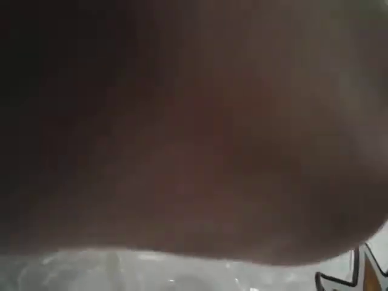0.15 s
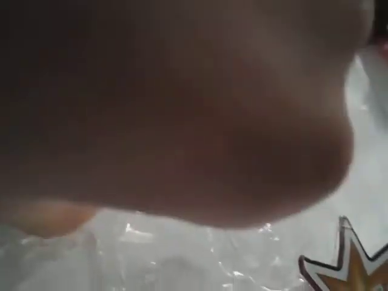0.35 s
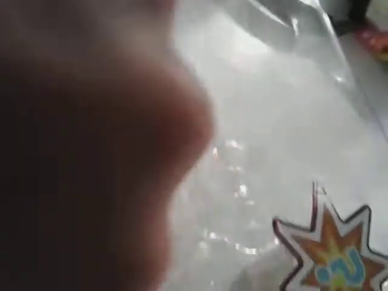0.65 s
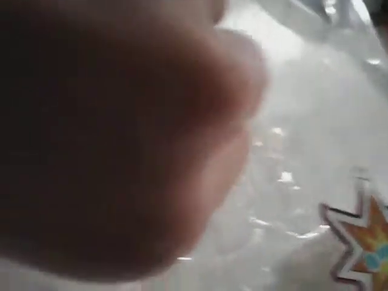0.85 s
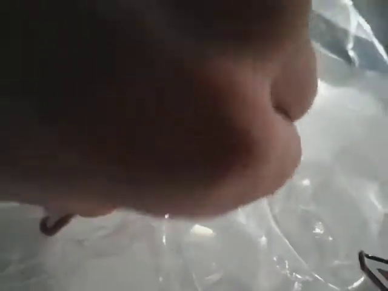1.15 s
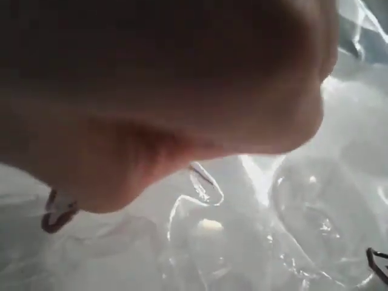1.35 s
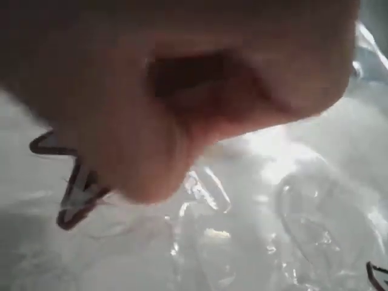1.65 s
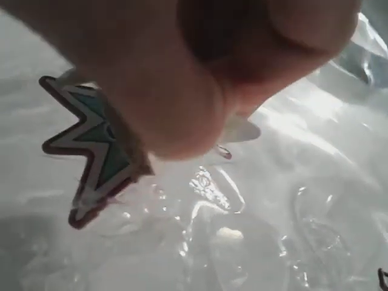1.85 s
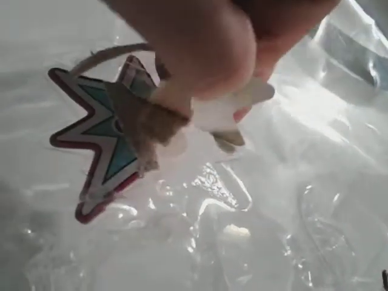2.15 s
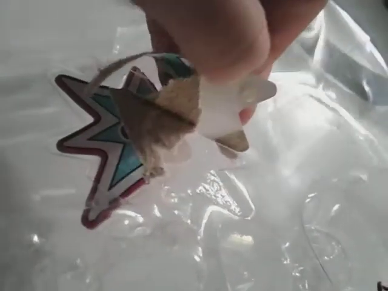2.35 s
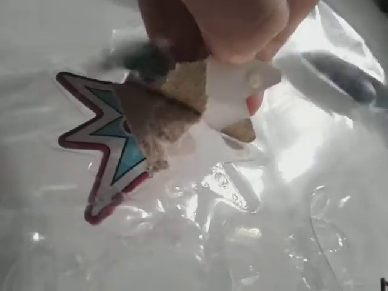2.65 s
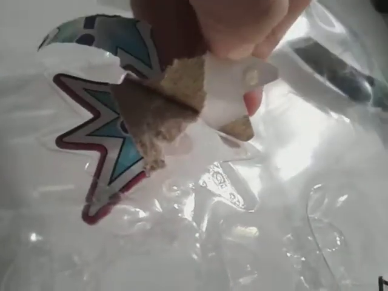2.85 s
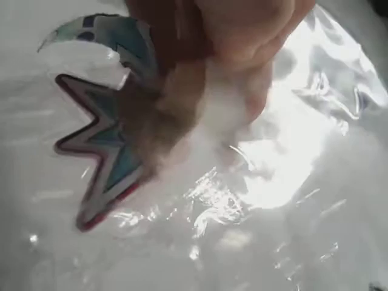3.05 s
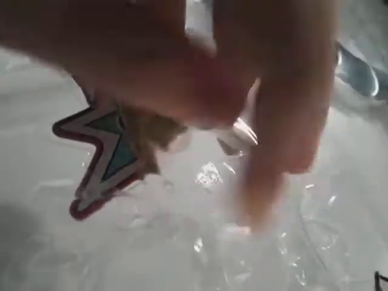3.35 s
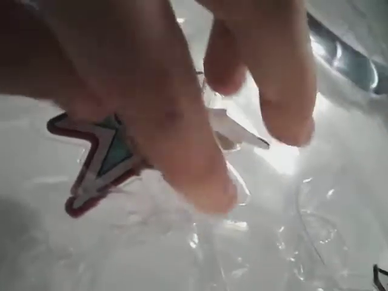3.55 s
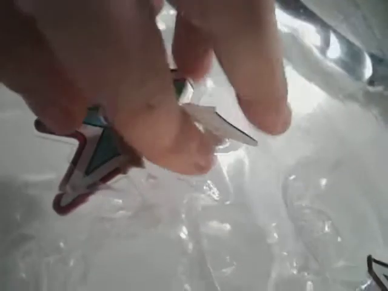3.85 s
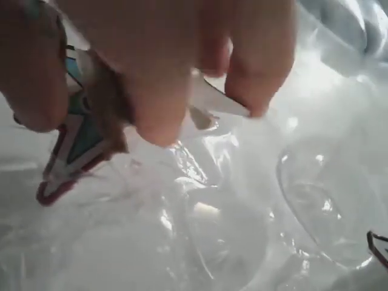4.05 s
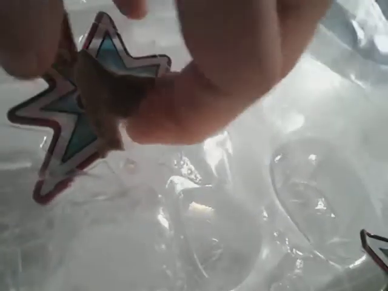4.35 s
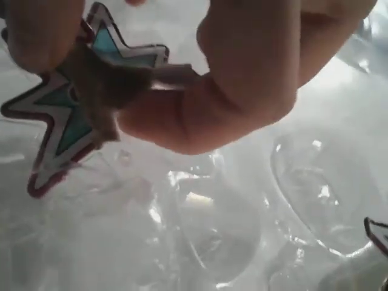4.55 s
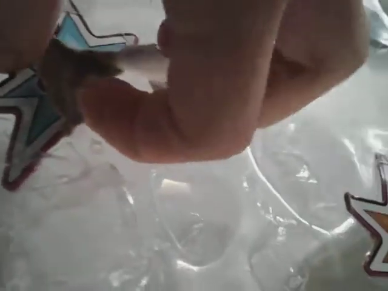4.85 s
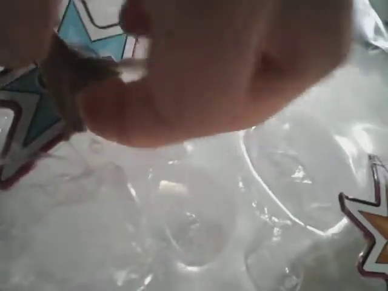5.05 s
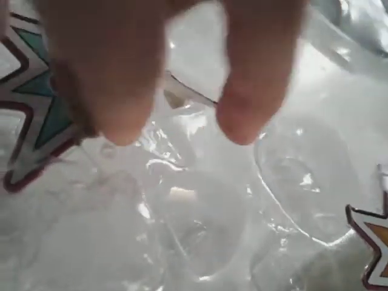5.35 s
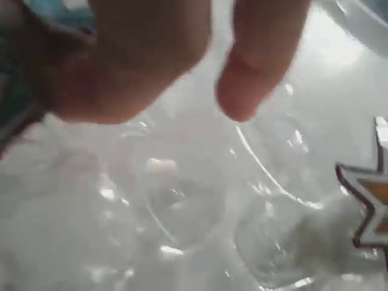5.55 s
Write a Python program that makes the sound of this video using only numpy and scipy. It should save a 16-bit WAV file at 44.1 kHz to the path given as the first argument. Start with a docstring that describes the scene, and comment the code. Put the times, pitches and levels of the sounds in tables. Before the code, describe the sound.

Fingers bend and pry a stiff plastic blister pack close to a small camera microphone. Light clicks and a juddering creak come first, then a hard snap before two seconds, sparse crinkles, a cluster of cracks just after three, and the loudest pop past four. Busy bright rattling clicks follow, thinning at the end. The quiet room answers briefly, with faint hum beneath.

```python
"""A clear plastic blister pack is pried open by hand, close to a small camera's microphone in a quiet room.
Its stiff shell buckles in sharp snaps: noise bursts rung through the resonances of the pack.
Trains of slips judder and creak, shaped noise crinkles; low thuds are sagging sines with dull noise.
Each click carries a brief answer from the room, over room noise and a faint hum of wavering sines."""
import sys
import numpy as np
from scipy import signal
from scipy.fft import rfft, irfft, next_fast_len
from scipy.io import wavfile
from scipy.ndimage import map_coordinates

SR = 44100
rng = np.random.default_rng(int(sys.argv[2]) if len(sys.argv) > 2 else 0)


def wav_record(signal):
    """Record a signal, one row per channel, as 16-bit PCM in the file named by sys.argv[1]."""
    frames = np.transpose(np.atleast_2d(signal))
    bounded = np.clip(frames, -1, 1)
    # unit amplitude maps onto the largest positive 16-bit level
    quanta = np.round(bounded * 32767).astype(np.int16)
    wavfile.write(sys.argv[1], SR, quanta)


N = 250929
HIT = SR // 2  # samples in one click with its tail

# The shell buckles or is tapped:
# (time [s], relative body level [dB], brightness = ring over body [dB], pitch of the bent spot [Hz])
SNAP_TIMES = [(.0477, -35.5, -29, 940), (0.0788, -55, 15, 1010), (0.1039, -40, -13, 935),
              (0.1484, -45.5, 5, 905), (0.2963, -50, -4, 1110), (0.3856, -45, -8, 1080),
              (0.4497, -30.5, -7, 890), (.5268, -34, -20, 1010), (0.5897, -27, -2, 1140),
              (1.0943, -44.5, 3, 980), (1.1284, -47, 8, 1030), (1.203, -28.5, -8, 1210),
              (1.2552, -34.5, -19, 1150), (1.2873, -37, -8, 1010), (1.3055, -49, 7.5, 1000),
              (1.3391, -35, -4, 1020), (1.3448, -42, 0.5, 910), (1.4101, -45.5, 7, 1030),
              (1.7363, -49, 21.5, 960), (1.7545, -14.5, 7.5, 887), (1.775, -20, -5, 990),
              (1.7968, -36, -2, 1020), (1.8385, -48, 11.5, 1000), (1.9535, -49, 8, 1070),
              (2.036, -43, -7, 930), (2.0813, -55.5, 12.5, 970), (2.1472, -34, 1.5, 910),
              (2.2646, -52.5, -5, 1130), (2.3942, -50, -9, 890), (2.4656, -46.5, -7, 924),
              (2.5347, -43.5, -16, 950), (2.6077, -26.5, -18, 1045), (2.7532, -40, -10, 880),
              (2.8971, -36, -14.5, 900), (3.0287, -40, -9.5, 897), (3.1845, -29.5, -12, 910),
              (3.203, -19.5, -9, 1110), (3.2141, -21, -1.5, 940), (3.2266, -24, -30, 1000),
              (3.2604, -41, 14.5, 930), (3.2823, -39.5, 9, 990), (3.471, -47.5, 5.5, 960),
              (3.501, -40.5, -1, 1070), (3.748, -48.5, 2.5, 990), (3.8852, -40.5, -19, 820),
              (4.0774, -21.5, -20, 900), (4.087, -33, -1, 920), (4.2137, -40.5, 6, 1060),
              (4.2221, -39.5, 1.5, 960), (4.2627, -43.5, -2, 885), (4.36, -8, -13, 1173),
              (4.4422, -30.5, -2, 1020), (4.4757, -34, 5, 860), (4.5238, -37.5, 8.5, 880),
              (4.5802, -48.5, 7, 1010), (4.6445, -36, 9.5, 1020), (4.698, -39.5, 17.5, 870),
              (4.7319, -37, 17.5, 1040), (4.7516, -34, 8.5, 1000), (4.7944, -28.5, 11.5, 950),
              (4.8202, -33, 10.5, 900), (4.8478, -34.5, 10.5, 980), (4.8827, -33, 10.5, 1000),
              (4.9836, -33, 8, 1000), (5.0542, -28, 6, 925), (5.0685, -33, 9, 990),
              (5.0782, -35.5, 7, 1010), (5.1458, -37.5, -1, 980), (5.1576, -37, -1.5, 1050),
              (5.1832, -42, 5, 820), (5.1918, -33.5, -20, 670), (5.1984, -38.5, 7.5, 780),
              (5.243, -44.5, 7.5, 940), (5.4572, -43, -3.5, 990), (5.5126, -35.5, 1, 920),
              (5.6169, -53, 31.5, 930), (5.6339, -49, 21, 980)]
# Registers of the pack, in the order knock, body, clack, ring; each kind of click shifts the base values:
# (low edge [Hz], high edge [Hz], base crack t60 [s], base shiver level [dB], shiver t60 [s], base room level [dB])
PACK_REGISTERS = [(161, 549, 0.035, -2, 0.14, -17), (559, 1576, 0.019, -7, 0.11, -11.5),
                  (1640, 4010, 0.0082, -3, 0.06, -10), (5230, 8670, 0.0084, -15.5, 0.14, -11)]
SPOT_HZ, KNOCK_DB = 942, -9  # usual bent spot, and its knock against the body
CLACK_DB = -5  # clack against the body, before brightness lifts it


def amp(db):
    """Amplitude ratio of a level in dB."""
    return 10 ** (np.asarray(db) / 20)


def unit(x):
    """x scaled to rms 1."""
    return x / np.sqrt(np.mean(x ** 2) + 1e-20)


def along(points, hz):
    """Interpolate (frequency [Hz], value) points on a log frequency axis."""
    f, v = np.transpose(points)
    return np.interp(np.log(hz + 1), np.log(f + 1), v)


def wobble(rate):
    """A smooth random curve, rate knots a second."""
    knots = rng.standard_normal(int(N * rate / SR) + 4)
    return map_coordinates(knots, [np.arange(N) * rate / SR])


def filtered(x, response):
    """x times a response of frequency."""
    m = next_fast_len(len(x) + SR // 8)
    return irfft(rfft(x, m) * response(np.fft.rfftfreq(m, 1 / SR)), m)[:len(x)]


def coloured(spectrum, size):
    """Noise of rms 1 shaped by a (frequency [Hz], relative level [dB]) spectrum."""
    return unit(filtered(rng.standard_normal(size), lambda hz: amp(along(spectrum, hz))))


def add(track, s, sound):
    """Mix a sound into the track from time s on."""
    part = track[max(0, round(s * SR)):][:len(sound)]
    part += sound[:len(part)]


def background():
    """Quiet room noise and a faint hum that wavers in level and phase."""
    hum_tones = [(119.5, -72), (240, -73), (748, -86)]  # wavering hum tones: (frequency [Hz], middle level [dB])
    air_spectrum = [(15, -24.5), (25, -4), (64, -2.5), (130, -4.5), (416, -16.5), (775, -18.5),
                    (1190, -25.5), (1740, -23.5), (2350, -27), (2990, -23), (4490, -39.5), (6740, -24),
                    (16000, -44)]  # room noise: (frequency [Hz], relative density [dB])
    t = np.arange(N) / SR
    hum = np.zeros(N)
    for hz, db in hum_tones:
        level = amp(db + 5.4 * wobble(1.2))
        hum += level * np.sqrt(2) * np.sin(2 * np.pi * hz * t + 0.33 * wobble(6.5))
    return hum + amp(-71.5) * coloured(air_spectrum, N)


def low_thuds(t60, sag, rise):
    """Finger bumps and a hard snap give dull thuds, each with a short hollow note of sagging pitch."""
    # low thuds of finger bumps and of a hard snap: (time [s], relative level [dB], middle pitch [Hz])
    thud_times = [(0.159, -38, 156.6), (0.459, -28, 185.7), (1.515, -39, 167), (1.759, -29, 128.6),
                  (2.391, -44.5, 165), (2.607, -37, 155.6), (2.758, -38, 153.3), (3.2, -23, 144),
                  (3.345, -37, 146), (3.474, -35, 146), (3.655, -42.5, 152), (3.841, -41, 159.3),
                  (4.018, -32.5, 156), (4.524, -48, 182), (5.195, -28.5, 300)]
    thud_spectrum = [(30, -25.5), (70, -3.5), (150, 4), (260, -6.5), (450, -21), (1500, -82)]  # dull noise of a thud: (frequency [Hz], relative level [dB])
    out, t = np.zeros(N), np.arange(SR // 4) / SR
    for s, db, hz in thud_times:
        pitch = hz * (1 + sag * (np.exp(-t / 0.027) - .5))
        note = np.sin(2 * np.pi * np.cumsum(pitch) / SR)
        envelope = amp(db - 60 * t / t60) * (1 - np.exp(-t / rise))
        thud = coloured(thud_spectrum, len(t))
        add(out, s - rise, envelope * (amp(-4.5) * note + amp(-6.5) * thud))
    return out


def shell(low_hz, high_hz, centre_hz=None):
    """Causal response of the pack in one register; a bent spot favours resonances near centre_hz."""
    pack_resonances = [(253, 59, -7.5), (355, 62, -8), (498, 50, -3.5), (615, 19, 1.5), (753, 22, 8),
                       (799, 89, 4), (881, 59, 3), (1094, 130, 0), (1260, 52, 0), (1357, 49, -4.5),
                       (1447, 78, -1), (1750, 420, -1.5), (2144, 160, -4), (2450, 320, -6.5),
                       (3170, 350, -8.5), (4030, 230, -22.5), (5700, 450, -7.5), (6590, 61, -3.5),
                       (6603, 600, 1), (6840, 56, -7), (7180, 120, -1), (7370, 210, -10), (7670, 430, -8.5),
                       (9900, 1200, -20.5), (12500, 1800, -32.5), (15000, 1700, -29.5)]  # plastic shell: (frequency [Hz], width [Hz], relative level [dB])
    capsule_colour = [(2500, -2.5), (4300, -2.5), (5300, -3.5), (6500, 0.5), (7800, -0.5), (9200, -0.5),
                      (11000, -6.5), (13000, -7), (16000, -8.5)]  # microphone colour on the pack: (frequency [Hz], gain [dB])
    f = np.fft.rfftfreq(4096, 1 / SR) + 1
    hz, width, db = np.transpose(pack_resonances)[:, :, None]
    peaks = (amp(db) * f * width) ** 2 / ((hz * hz - f * f) ** 2 + (f * width) ** 2)
    power = np.sum(peaks, axis=0)
    power = power / (1 + (low_hz / f) ** 6) / (1 + (f / high_hz) ** 8)
    power = power * amp(along(capsule_colour, f)) ** 2
    if centre_hz:
        power = power / (1 + (np.log(f / centre_hz) / 0.26) ** 2)
    # folding the cepstrum gives minimum phase: no sound ahead of the strike
    cepstrum = irfft(np.log(power + 1e-12) / 2)
    cepstrum[1:len(f) - 1] *= 2
    cepstrum[len(f):] = 0
    return irfft(np.exp(rfft(cepstrum)))[:SR // 14]


def voicing(db, bright_db, knock_db, clack_db):
    """Levels of knock, body, clack and ring: a sharper buckle lifts the upper registers."""
    clack_share = 0.49  # the clack lies between body and ring
    return db + knock_db, db, db + clack_db + clack_share * bright_db, db + bright_db


def effort(length, rise, t60):
    """Attack, hold and release of one push on the plastic."""
    t = np.arange(round((length + t60) * SR)) / SR
    return np.minimum(t / rise, 1) * amp(-60 * np.maximum(t - length, 0) / t60)


def activity(knock_db, clack_db):
    """Crinkling strength per register: steady grip, finger moves, strain before snaps, rattle after them."""
    # The fingers crumple or rub the pack; rasp is extra level in the clack register:
    # (start [s], length [s], relative body level [dB], brightness [dB], rasp [dB])
    finger_moves = [(0, 0.068, -48, -6, 1), (0.155, 0.014, -48, -16, 3.5), (0.424, 0.09, -50, -7.5, 2.5),
                    (0.546, 0.4, -44.5, -11, 1.5), (0.706, 0.1, -41.5, -1, -5),
                    (1.006, 0.034, -48.5, -8.5, -0.5), (1.125, 0.041, -51, -9, -2),
                    (1.184, 0.06, -49, -1, 4), (1.423, 0.099, -43.5, -11.5, -1.5),
                    (1.632, 0.09, -49.5, -8, 0), (1.761, 0.037, -32.5, 5.5, 6), (1.843, 0.073, -62, 6.5, 8),
                    (2.6, 0.022, -44, -12, -2), (2.752, 0.022, -52, -3, 3.5), (3.185, 0.017, -33, -2, -2),
                    (3.195, 0.017, -28, -5.5, 2.5), (3.265, 0.015, -39, -8, 4.5),
                    (3.333, 0.019, -50.5, -4, 2), (3.475, 0.014, -46, -2.5, 7), (3.619, 0.02, -56, -8.5, 0),
                    (3.717, 0.017, -50, -8.5, 3), (3.835, 0.028, -51.5, -11.5, -2),
                    (3.966, .06, -50, -9, 6), (4.048, 0.13, -49, -13, -9), (4.219, 0.022, -41, -9, 1),
                    (4.329, 0.019, -42.5, -5, 1.5), (4.38, 0.062, -41, -14, 2),
                    (4.508, 0.023, -38.5, -10.5, -0.5), (4.658, 0.11, -47.5, -7, 3.5),
                    (5.035, .015, -43.5, 4.5, -2), (5.056, 0.036, -38, 0, 1.5),
                    (5.168, 0.026, -41, -8.5, 5), (5.222, 0.013, -53, 0, 0), (5.435, .03, -54, -11, -5),
                    (5.474, .105, -42, -7.5, -0.5), (5.566, 0.1, -36.5, -4, -10),
                    (5.598, 0.07, -47, 19.5, -23)]
    # Power law of effort in knock, body, clack and ring: the clack fades fastest, the knock slowest.
    # (exponent [1] for each register)
    effort_laws = (0.84, 1.04, 1.22, 1)
    move_rise_s, move_t60_s = 0.016, 0.24  # a move takes hold quickly and dies away
    rattle_db, bright_db, rattle_rasp_db = -23, -10.5, 3  # the pack settling, against its snap
    rattle = effort(length=.02, rise=.02, t60=0.3)
    # the shell rustles under strain before it gives: level against the snap, ceiling, length
    lead_db, lead_top_db, lead_s = -21.5, -46, 0.0058
    lead = effort(lead_s, lead_s, lead_s)

    pushes = []
    for s, length, *colour in finger_moves:
        pushes.append((s, effort(length, move_rise_s, move_t60_s), *colour))
    for s, db, *_ in SNAP_TIMES:
        pushes.append((s, rattle, db + rattle_db, bright_db, rattle_rasp_db))
        pushes.append((s - lead_s, lead, min(db + lead_db, lead_top_db), bright_db, 0))
    # the faint rustle of just holding the pack
    pushes.append((0, amp(2.4 * wobble(10)), -79, -6.5, 0))

    power = np.zeros((len(PACK_REGISTERS), N))
    for s, envelope, db, brightness, rasp_db in pushes:
        levels = voicing(db, brightness, knock_db, clack_db + rasp_db)
        for track, level_db, law in zip(power, levels, effort_laws):
            add(track, s, (amp(level_db) * envelope ** law) ** 2)
    return np.sqrt(power)


def crinkle(rate, spread_db, knock_db, clack_db):
    """Many tiny buckles of uneven size, over the scrape of skin and card, excite the pack's resonances."""
    flex_spectrum = [(20, -25.5), (45, -16), (70, -3.5), (140, 6), (200, -4.5), (400, -32.5), (1500, -88)]  # the pack bending as a whole: (frequency [Hz], relative level [dB])
    hiss_spectrum = [(5000, -39), (10000, 0), (16000, -5)]  # thin high hiss: (frequency [Hz], relative level [dB])
    strengths = activity(knock_db, clack_db)
    body = strengths[1]
    happens = rng.random(N) < rate / SR
    sizes = happens * amp(spread_db * np.minimum(rng.exponential(size=N), 3))
    life = amp(-60 * np.arange(SR // 50) / SR / .01)  # each buckle has a t60 of 10 ms
    grains = unit(np.sqrt(np.abs(signal.fftconvolve(sizes ** 2, life ** 2)[:N])))
    # scrape against grains in knock, body, clack and ring
    scrapes = (1.4, 1.5, 0.71, 1.2)
    out = np.zeros(N)
    for (low_hz, high_hz, *_), strength, scrape in zip(PACK_REGISTERS, strengths, scrapes):
        force = np.hypot(grains, scrape) * rng.standard_normal(N)
        out += unit(signal.fftconvolve(force, shell(low_hz, high_hz))[:N]) * strength
    # the whole pack flexes under the same pressure
    out += coloured(flex_spectrum, N) * amp(-29.5) * body ** 0.55
    # a thin high hiss rises and falls with the handling
    return out + coloured(hiss_spectrum, N) * amp(-52.0) * body ** .48


def burst(envelope, response):
    """Noise under an envelope, rung through a response, with energy 1."""
    x = signal.fftconvolve(envelope * rng.standard_normal(len(envelope)), response)
    return np.pad(x / np.linalg.norm(x), (0, HIT))[:HIT]


def clicks(rows, hold, decay, shiver_db, room_db):
    """Each click is a brief crack, a short shiver of the shell and the room's answer, in every register."""
    room_decay = [(200, 0.3), (800, 0.26), (2500, 0.39), (7000, 0.19), (14000, 0.21)]  # the room's reverberation: (frequency [Hz], t60 [s])
    onset = round(.006 * SR)  # samples over which a click's level is set
    out, t = np.zeros(N), np.arange(HIT * 2 // 3) / SR
    short = t[:SR // 8]
    for k, (low_hz, high_hz, crack_t60, after_db, after_t60, wet_db) in enumerate(PACK_REGISTERS):
        whole = shell(low_hz, high_hz)
        crack = amp(-60 * np.maximum(short[:SR // 25] - hold, 0) / (decay * crack_t60))
        shiver = amp(-60 * short / after_t60) * (1 - np.exp(-short / 0.0046))
        room_t60 = along(room_decay, np.sqrt(low_hz * high_hz))
        room = amp(-60 * t / room_t60) * (1 - np.exp(-t / 0.0055))
        for s, *levels, centre_hz in rows:
            # only the register that holds the bent spot is tuned to it
            spot = shell(low_hz, high_hz, centre_hz) if low_hz < centre_hz < high_hz else whole
            hit = burst(crack, spot) + amp(after_db + shiver_db) * burst(shiver, spot)
            hit = hit + amp(wet_db + room_db) * burst(room, whole)
            add(out, s, amp(levels[k]) * hit / np.sqrt(np.mean(hit[:onset] ** 2)))
    return out


def stray_ticks():
    """Small creases in the relaxing plastic tick at random moments."""
    per_s, middle_db, spread_db, bright_db = 11, -67, 2, 6
    rows = []
    for at, size in rng.random((round(per_s * N / SR), 2)):
        db = middle_db + spread_db * (2 * size - 1)
        rows.append((at * N / SR, *voicing(db, bright_db, KNOCK_DB, CLACK_DB), SPOT_HZ))
    return clicks(rows, hold=.0012, decay=.7, shiver_db=-2, room_db=-2)


def stick_slip(clack_db):
    """A fingertip judders or the shell creaks, hardest in mid-push; more even slips ring more alike."""
    # A spot sticks and slips under strain:
    # (start [s], end [s], slip rate at start [1/s], in the middle [1/s], at the end [1/s],
    #  unevenness [0-1], body level in mid-push [dB], brightness [dB], hold of a slip before it decays [s])
    strained_spots = [(0.621, 0.949, 48.16, 90.55, 49.9, .85, -32, -4.5, 0.0026),
                      (1.437, 1.547, 171, 198.7, 179.7, 0.58, -47, -19, 0.0035),
                      (1.633, 1.73, 164.3, 124.7, 106.6, 0.034, -47, -3, .0008),
                      (3.994, 4.161, 62.04, 92.4, 95.4, 0.21, -45.5, -2, .0011)]
    slip_hz, knock_db, swell_db = 980, -12.5, 3  # pitch, knock against body, growth in mid-push
    scatter_db, jitter = 1.5, .2  # scatter of size and of log gap when fully uneven
    out = np.zeros(N)
    for start, end, *rates, uneven, db, bright_db, hold in strained_spots:
        length = end - start
        rate_times = [start, start + length / 2, end]
        slips, s = [], start
        while s < end:
            swell = swell_db * (np.sin(np.pi * (s - start) / length) - 1)
            slips.append((s, db + swell + rng.normal(0, scatter_db * np.sqrt(uneven))))
            s += np.exp(rng.normal(0, jitter * uneven)) / np.interp(s, rate_times, rates)

        def play(hits):
            """Ring slips given as (time, level)."""
            rows = [(at, *voicing(level, bright_db, knock_db, clack_db), slip_hz) for at, level in hits]
            return clicks(rows, hold=hold, decay=0.46, shiver_db=-2.0, room_db=-7.0)

        # one identical sound, 3.7 ms into its slot, shared by all slips of the push
        common = play([(0.0037, 0)])[:HIT]
        for s, level in slips:
            add(out, s, np.sqrt(1 - uneven) * amp(level) * common)
        out += np.sqrt(uneven) * play(slips)
    return out


def snaps():
    """The shell pops from one bend into another; a wider, lower spot knocks harder."""
    knock_db_per_octave = -30
    rows = []
    for s, db, bright_db, hz in SNAP_TIMES:
        knock_db = KNOCK_DB + knock_db_per_octave * np.log2(hz / SPOT_HZ)
        rows.append((s, *voicing(db, bright_db, knock_db, CLACK_DB), hz))
    return amp(-3.5) * clicks(rows, hold=0.0024, decay=1.45, shiver_db=-3.0, room_db=-1.0)


def scene():
    """One close microphone, weak in the deepest bass, feeds both channels."""
    pack = snaps() + stray_ticks()
    pack += crinkle(rate=250, spread_db=6.5, knock_db=-5.0, clack_db=-4.5)
    pack += low_thuds(t60=0.21, sag=0.41, rise=0.0044)
    pack += stick_slip(clack_db=-7)
    bass_cut = signal.butter(2, 42, "highpass", fs=SR, output="sos")
    mono = signal.sosfilt(bass_cut, pack + background())
    return np.array([mono, mono])


def record(dry):
    """Loud peaks saturate the camera, the positive side earlier; a steep filter ends the band at top_hz."""
    top_hz = 16000
    ceiling = 1.15 - 0.16 * np.sign(dry)
    held = dry / (1 + np.abs(dry / ceiling) ** 6) ** (1 / 6)
    return np.array([filtered(x, lambda hz: 1 / np.sqrt(1 + (hz / top_hz) ** 160)) for x in held])


dry = scene()
out = record(dry)
wav_record(out)
```